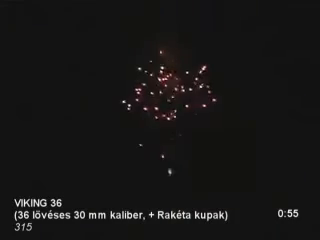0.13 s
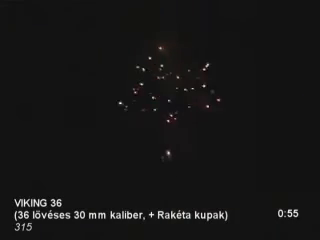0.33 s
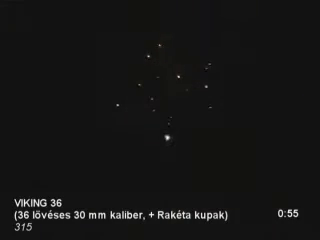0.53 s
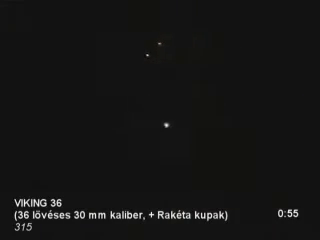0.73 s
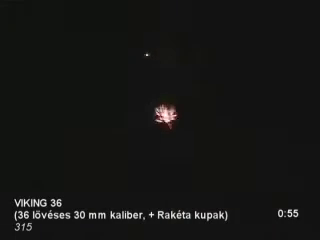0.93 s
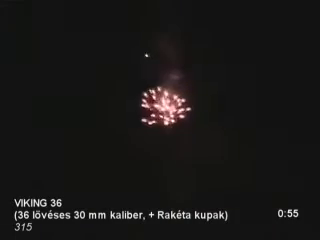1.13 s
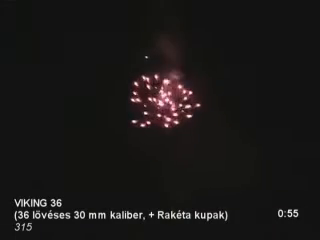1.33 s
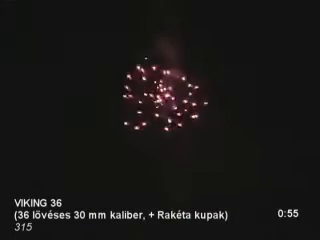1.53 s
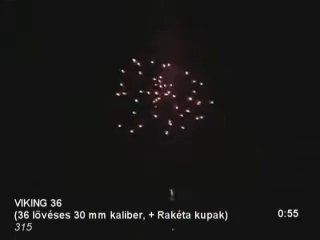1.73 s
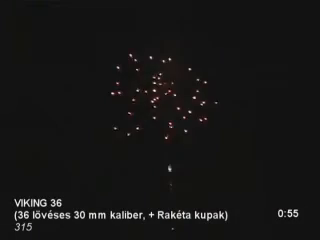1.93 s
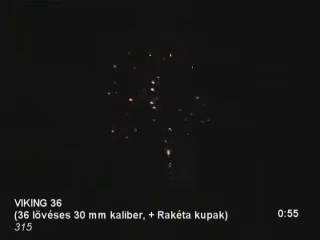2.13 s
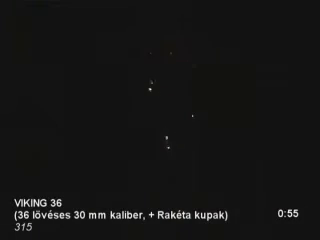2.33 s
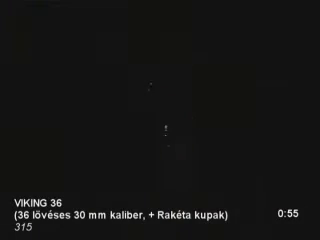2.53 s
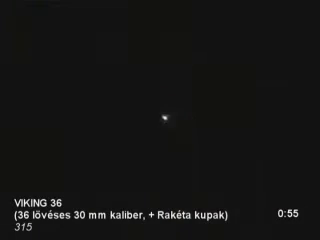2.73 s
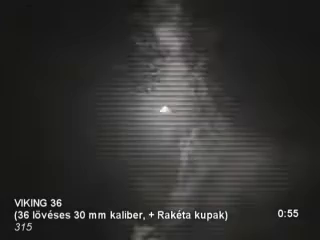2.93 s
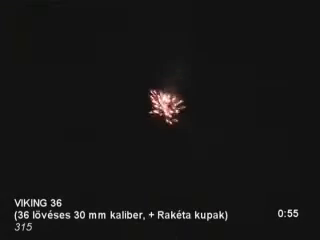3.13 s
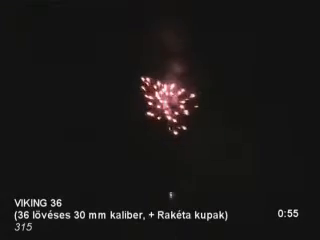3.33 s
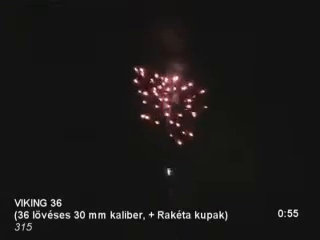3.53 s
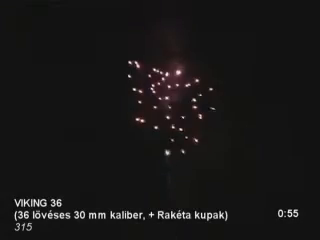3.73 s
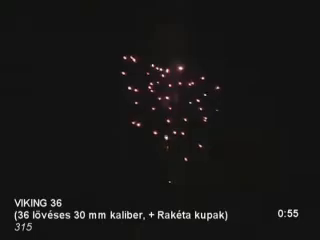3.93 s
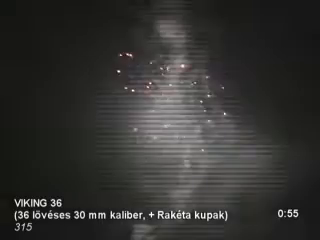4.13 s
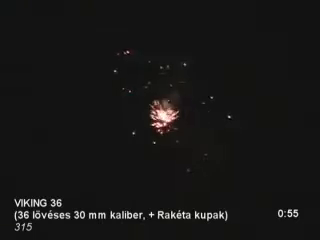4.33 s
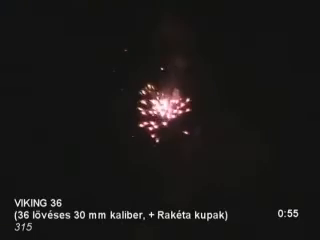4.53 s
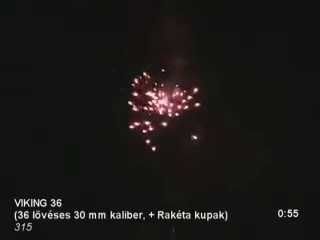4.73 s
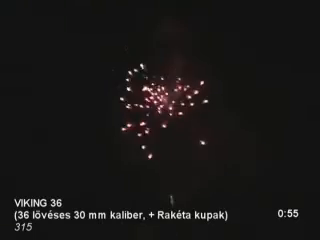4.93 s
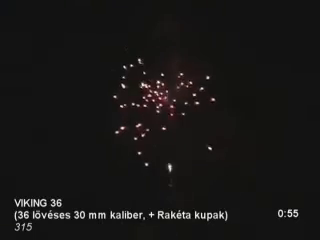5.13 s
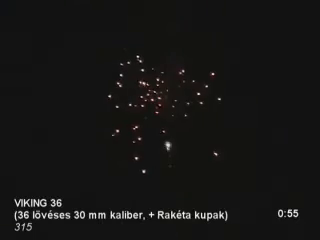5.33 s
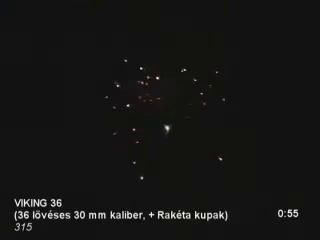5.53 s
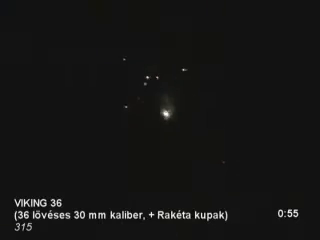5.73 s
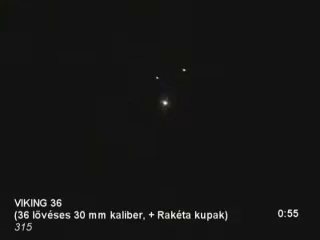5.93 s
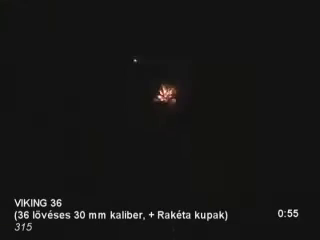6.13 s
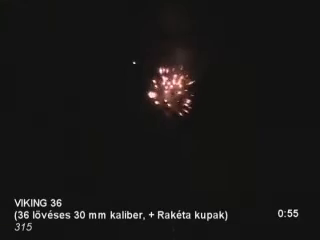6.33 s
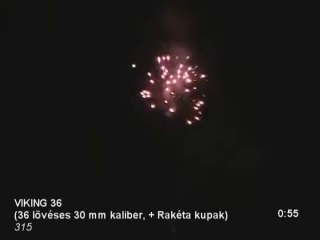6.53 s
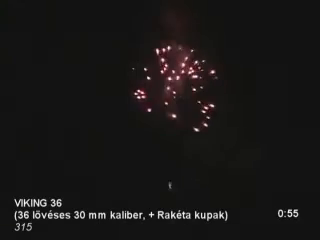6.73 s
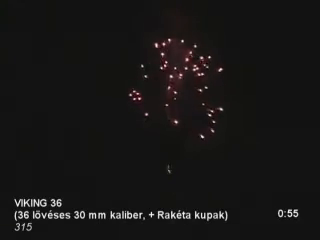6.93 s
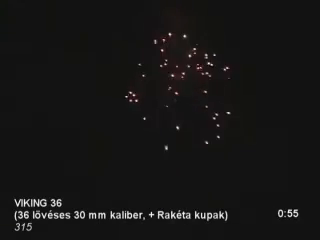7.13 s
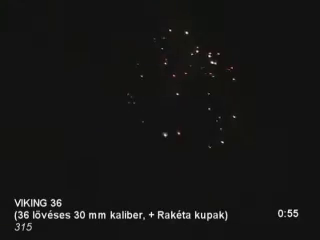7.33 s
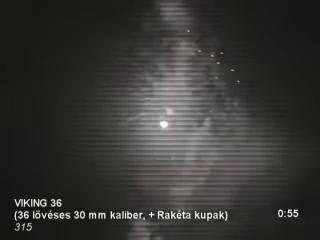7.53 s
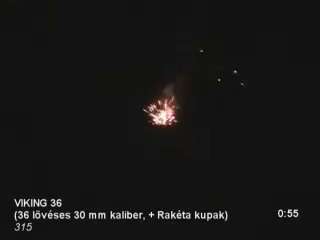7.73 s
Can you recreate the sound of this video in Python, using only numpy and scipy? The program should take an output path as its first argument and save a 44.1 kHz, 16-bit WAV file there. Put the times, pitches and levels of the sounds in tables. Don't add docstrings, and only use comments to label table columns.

```python
import sys
import numpy as np
from scipy import signal
from scipy.io import wavfile

SR = 44100
rng = np.random.default_rng(int(sys.argv[2]) if len(sys.argv) > 2 else 0)


def voltage_ratio(decibels):
    exponent = np.asarray(decibels, float) / 20
    return 10 ** exponent


def wav_out(sig):
    wavfile.write(sys.argv[1], SR, np.round(np.clip(np.atleast_2d(sig).T, -1, 1) * 32767).astype(np.int16))


N = 343085

# (time [s], blast length [ms], boom [Hz], ground echo lag [ms])
BURSTS = [
    (1.28345, 1.63, 297, 4.53),
    (3.37891, 2.3, 380, 4.75),
    (4.60576, 1.29, 295, 4.40),
    (6.50237, 2.0, 354, 5.04),
]
# (time [s], overpressure [dB], ground echo lag [ms], ground echo share [ratio])
LIFTS = [
    (1.68764, 13.8, .52, .28),
    (3.32016, 13.8, .61, .55),
    (5.00141, 14.2, .6, .39),
    (6.65723, 11.8, .45, .36),
]
# (time [s], peak [dB], centre [Hz])
ECHOES = [(1.327, -35, 1700), (1.383, -33, 895), (1.508, -25.5, 1000), (1.723, -26.5, 2300),
          (2.205, -36, 700), (3.355, -23, 2000), (3.423, -33.5, 1690), (3.485, -30.5, 1280),
          (3.569, -32, 1200), (3.605, -31.5, 880), (3.766, -22.5, 600), (3.787, -26, 600),
          (4.139, -40, 890), (4.649, -41, 1300), (4.705, -41, 900), (4.832, -31.5, 1110),
          (5.037, -25, 2520), (6.546, -37, 1500), (6.612, -28.5, 990), (6.693, -28, 2510), (6.73, -39, 900)]
RUSH_HZ = (135, 420, 1350, 4250)
# (frequency [Hz], density [dB per Hz])
RUSH_COLOUR_DB = [(40, -20.5), (86, -13), (146, 0), (226, -2), (335, 0.5), (496, 2.5), (752, -1.5),
                  (1110, 0.5), (1400, -3), (2030, 1), (3620, 0.5), (6450, -11), (8120, -29.5),
                  (9500, -40.5)]
# (frequency [Hz], density [dB per Hz])
NIGHT_COLOUR_DB = [(30, -14), (60, -22.5), (150, -24), (1000, -22.5), (3800, -42.5), (4600, -39.5),
                   (5600, -36), (6500, -40.5), (8500, -39), (11500, -40)]
# (frequency [Hz], density [dB per Hz])
GATE_FLOOR_DB = [(2500, -125), (4000, -114), (5700, -112), (6500, -113), (7600, -110), (9500, -109),
                 (11500, -107)]
BURST_RETURN_DB = [-0.13, 0.19, -1.0, -0.36, -0.54]
LIFT_RETURN_DB = [-10.5, -13, -9.5, -10.5, -15]
# (time after shot [s], level [dB])
NEAR_LAND = [(.008, -20), (.022, 2), (.058, -5.5), (.09, 0.5), (.125, 1.5), (.2, 5), (.3, -4.9)]
# (time after shot [s], level [dB])
FAR_LAND = [(.221, -40), (.228, -8), (.25, -4.5), (.28, 0.5), (.32, -1.5), (.5, 0.5), (.9, 1), (1.4, -1),
            (2.1, -4)]
# (near level [dB], near fade [dB per s], far level [dB], far fade [dB per s])
RUSH_LAW = [(-46.5, 39, -59.5, 5.5), (-53, 23, -34.5, 7), (-48, 10, -34, 13), (-53, 18.5, -31, 46)]
LIFT_TILT_DB = (-5, -2.5, 1.5, -3)

NIGHT_DB = -60.5
BURST_DB, BURST_GROUND_SHARE = 13.3, .39
LIFT_MS, LIFT_HZ = .078, 114
EARLIER_BURST_S, EARLIER_RETURN_S, EARLIER_LIFT_S = -0.33, -0.48, -0.088


def in_time(points, t):
    s, db = np.transpose(points)
    return np.interp(t, s, db, left=-200)


def at_hz(points, hz):
    points_hz, db = np.transpose(points)
    return np.interp(np.log(hz), np.log(points_hz), db)


def drift(rate_hz):
    r = np.exp(-80 * np.pi * rate_hz / SR)
    noise = rng.standard_normal(N // 40 + 2002)
    slow = signal.lfilter([1], [1, -2 * r, r * r], noise)[2000:]
    return np.interp(np.arange(N) / 40, np.arange(len(slow)), slow / slow.std())


def dull(x, hz):
    r = np.exp(-2 * np.pi * hz / SR)
    return signal.lfilter([1 - r], [1, -r], x)


def bass_cut(x, hz, q):
    w = 2 * np.pi * hz / SR
    a, c = np.sin(w) / (2 * q), np.cos(w)
    return signal.lfilter([(1 + c) / 2, -1 - c, (1 + c) / 2], [1 + a, -2 * c, 1 - a], x)


def band(x, low_hz, high_hz):
    return signal.sosfilt(signal.butter(2, [low_hz, high_hz], "band", fs=SR, output="sos"), x)


def steep_cut(x, hz, depth_db):
    return signal.sosfiltfilt(signal.cheby2(8, depth_db / 2, hz, fs=SR, output="sos"), x)


def add(out, s, x):
    i = int(s * SR)
    out[i:i + len(x)] += x[:N - i]


def noise_bands():
    white = rng.standard_normal((2, N))
    edges_hz = 35 * 2 ** np.arange(0, 8.4, 1 / 3)
    pairs = enumerate(zip(edges_hz, edges_hz[1:]))
    return [(np.sqrt(low * high), band(white[k % 2], low, high)) for k, (low, high) in pairs]


def returns_db():
    t = np.arange(0, N + 32, 32) / SR
    near_db, near_fade, far_db, far_fade = np.transpose(RUSH_LAW)[:, :, None]
    tilt_db = np.array(LIFT_TILT_DB)[:, None]
    burst_s = [EARLIER_RETURN_S] + [row[0] for row in BURSTS]
    lift_s = [EARLIER_LIFT_S] + [row[0] for row in LIFTS]
    returns = list(zip(burst_s, BURST_RETURN_DB))
    returns += [(s, db + tilt_db) for s, db in zip(lift_s, LIFT_RETURN_DB)]
    power = 1e-14
    for s, db in returns:
        late = np.maximum(t - s, 0)
        power = power + voltage_ratio(db + near_db - near_fade * late + in_time(NEAR_LAND, late)) ** 2
        power = power + voltage_ratio(db + far_db - far_fade * late + in_time(FAR_LAND, late)) ** 2
    return np.array([np.interp(np.arange(N) / SR, t, 10 * np.log10(p)) for p in power])


def rush_and_night(lumps_db, own_db):
    widths_db = 10 * np.log10([[110], [450], [1100], [3000]])
    per_hz_db = returns_db() - widths_db + 10 * np.log10(SR / 2)
    lumps, rush, night = drift(28), 0, 0
    anchors = np.arange(len(RUSH_HZ))
    for hz, noise in noise_bands():
        place = np.interp(np.log(hz), np.log(RUSH_HZ), anchors)
        shares = np.clip(1 - np.abs(place - anchors), 0, 1)
        common_db = lumps_db * lumps * (1 - shares[-1])
        patchy_db = common_db + own_db * drift(16)
        rush = rush + voltage_ratio(shares @ per_hz_db + at_hz(RUSH_COLOUR_DB, hz) + patchy_db) * noise
        night = night + voltage_ratio(at_hz(NIGHT_COLOUR_DB, hz)) * noise[::-1]
    return rush + voltage_ratio(NIGHT_DB) * night / night.std()


def near_scatter(db, t60, low_hz, high_hz):
    t = np.arange(N) / SR
    fading = 0
    for row in BURSTS:
        decay = voltage_ratio(-60 * np.maximum(t - row[0], 0) / t60)
        fading = fading + (t > row[0] + .018) * decay
    return voltage_ratio(db) * fading * band(rng.standard_normal(N), low_hz, high_hz)


def treble_gate(x, masked_db):
    frame = dict(fs=SR, window="cosine", nperseg=4096, noverlap=2048, scaling="psd")
    hz, _, lines = signal.stft(x, **frame)
    size = np.abs(lines)
    floor = voltage_ratio(at_hz(GATE_FLOOR_DB, np.maximum(hz, 1)) + 3.5)[:, None]
    top_share = np.clip((hz[:, None] - 7000) / 2500, 0, 1)
    loud_floor = voltage_ratio(masked_db) * size.mean(axis=0) * top_share
    keep = (size > floor + loud_floor) | (hz[:, None] < GATE_FLOOR_DB[0][0])
    return signal.istft(lines * keep, **frame)[1][:N]


def masking(depth_db, width_ms):
    ms, gain_db = np.arange(N) / SR * 1000, np.zeros(N)
    for row in BURSTS + LIFTS:
        gap_ms = row[0] * 1000 - 11
        gain_db += depth_db * np.exp(-((ms - gap_ms) / width_ms) ** 4)
    return voltage_ratio(gain_db)


def far_field():
    far = rush_and_night(lumps_db=1.11, own_db=1.53)
    far += near_scatter(db=-53.5, t60=0.5, low_hz=6060, high_hz=11400)
    far = treble_gate(far, masked_db=-20)
    bass = steep_cut(far, hz=2600, depth_db=40)
    return bass + (far - bass) * masking(depth_db=-25, width_ms=3.5)


def echoes():
    out, t = np.zeros(N), np.arange(900) / SR
    for (s, db, hz), noise in zip(ECHOES, rng.standard_normal((len(ECHOES), len(t)))):
        puff = band(noise * (t / .001) * np.exp(-t / .001), hz / 2.2, hz * 2.1)
        puff = dull(dull(puff, 1.6 * hz), 5000)
        add(out, s, voltage_ratio(db + 1.5) * puff / np.abs(puff).max())
    return steep_cut(out, hz=10400, depth_db=44.5)


def blast(t, ms, damping):
    u = np.maximum(t, 0) / (ms / 1000)
    return -(1 - u) * np.exp(-damping * u) * np.clip(t * SR + .5, 0, 1)


def shots(table, damping, q, air_hz, ground_hz):
    out = np.zeros(N)
    for s, db, ms, hz, lag_ms, share in table:
        t = np.arange(4000) / SR - (s * SR % 1) / SR
        direct = dull(blast(t, ms, damping), air_hz)
        echo = dull(dull(blast(t - lag_ms / 1000, ms, damping), ground_hz), ground_hz)
        add(out, s, voltage_ratio(db) * bass_cut(direct + share * echo, hz, q))
    return out


def smear(table, db, before_ms, after_ms, low_hz, high_hz):
    lead = 400
    out, ms = np.zeros(N), np.arange(-lead, 2 * lead) / SR * 1000
    shape = np.exp(-(ms / np.where(ms < 0, before_ms, after_ms)) ** 4)
    shape *= 1 - np.exp(-(ms / .3) ** 2)
    for row, noise in zip(table, rng.standard_normal((len(table), len(ms)))):
        ragged = dull(band(noise, low_hz, high_hz), high_hz)
        add(out, row[0] - lead / SR, voltage_ratio(db) * shape * ragged)
    return out


def thump(table, db, hz, t60, late_ms):
    out, t = np.zeros(N), np.arange(3000) / SR
    for row in table:
        add(out, row[0] + late_ms / 1000, -voltage_ratio(db - 60 * t / t60) * np.sin(2 * np.pi * hz * t))
    return out


def overload(x, hardness):
    return x / (1 + np.abs(x) ** hardness) ** (1 / hardness)


def offset():
    out = np.zeros(N)
    for s in [EARLIER_BURST_S] + [row[0] for row in BURSTS]:
        t = np.maximum(np.arange(N) / SR - s - .0004, 0)
        push = .046 * np.exp(-t / .033) + .16 * np.exp(-t / .003)
        swing = .012 * np.exp(-t / .3) * np.sin(np.pi * t / .75)
        out += (1 - np.exp(-t / .001)) * push - swing
    return out


def lift_charges():
    table = [(s, db, LIFT_MS, LIFT_HZ, lag_ms, share) for s, db, lag_ms, share in LIFTS]
    out = overload(shots(table, damping=1, q=4, air_hz=2000, ground_hz=3600), hardness=6)
    out += smear(LIFTS, db=-11, before_ms=2.6, after_ms=3.2, low_hz=800, high_hz=4500)
    out += smear(LIFTS, db=-27, before_ms=6, after_ms=10, low_hz=600, high_hz=4000)
    top = band(band(out, 10200, 11300), 10200, 11300)
    out = steep_cut(out, hz=8600, depth_db=60) + voltage_ratio(-15) * top
    return 1.03 * out + thump(LIFTS, db=-26.0, hz=160, t60=0.036, late_ms=2.36)


def shell_bursts():
    table = [(s, BURST_DB, ms, hz, lag_ms, BURST_GROUND_SHARE) for s, ms, hz, lag_ms in BURSTS]
    out = .96 * overload(shots(table, damping=2.24, q=.97, air_hz=3400, ground_hz=900), hardness=4.5)
    out += smear(BURSTS, db=-18, before_ms=4, after_ms=8, low_hz=700, high_hz=2800)
    out += smear(BURSTS, db=-25, before_ms=3.8, after_ms=5.1, low_hz=3000, high_hz=8680)
    out -= 0.56 * (steep_cut(out, hz=11200, depth_db=42) - steep_cut(out, hz=9400, depth_db=39.5))
    out += smear(BURSTS, db=-33, before_ms=4.2, after_ms=14, low_hz=600, high_hz=5000)
    out += smear(BURSTS, db=-26, before_ms=3.5, after_ms=4.5, low_hz=10520, high_hz=12300)
    return out


def scene():
    return np.array([far_field() + echoes() + lift_charges() + shell_bursts()])


def low_pass(x):
    return signal.sosfilt(signal.butter(12, 16450, fs=SR, output="sos"), x)


def record(dry):
    kept = steep_cut(dry, hz=11970, depth_db=11)
    mix = np.clip(kept + offset(), -1, 1)
    return low_pass(mix)


dry = scene()
out = record(dry)
wav_out(out)
```